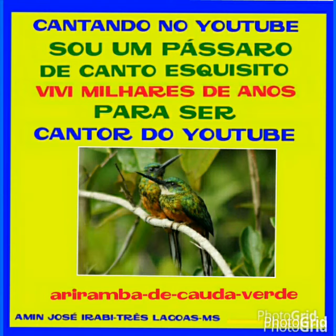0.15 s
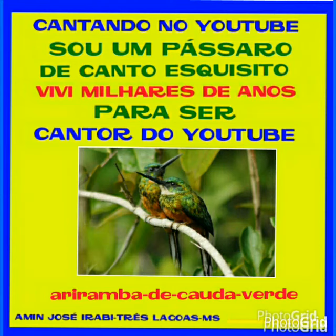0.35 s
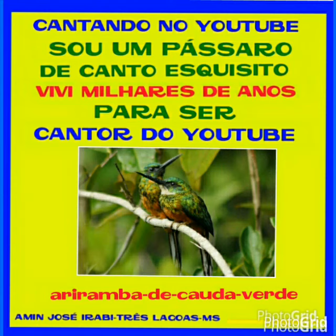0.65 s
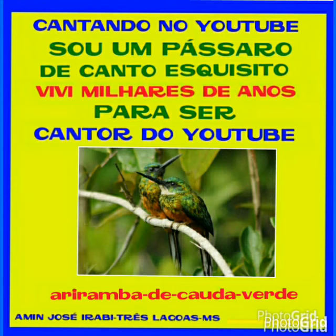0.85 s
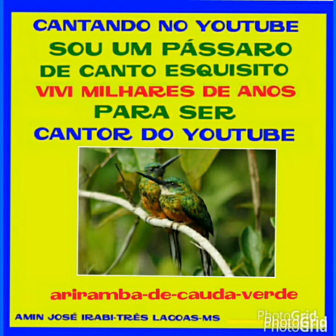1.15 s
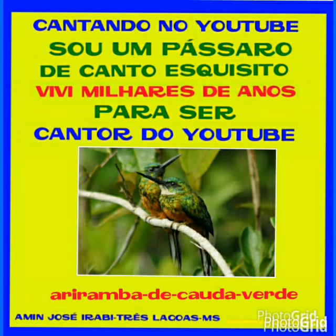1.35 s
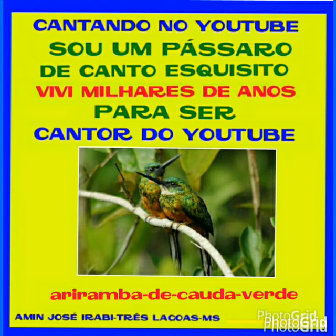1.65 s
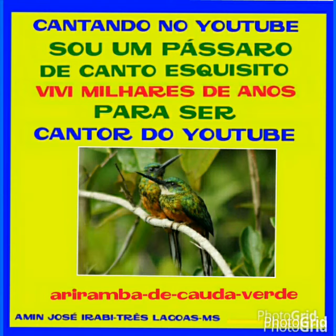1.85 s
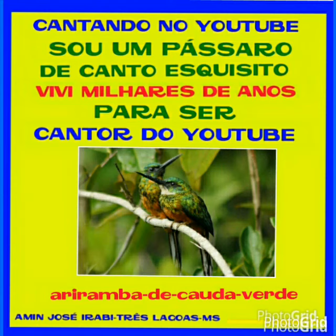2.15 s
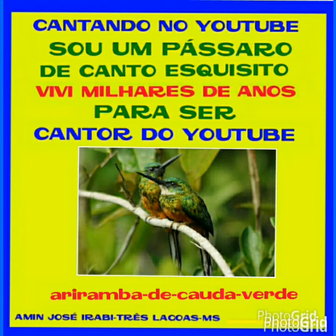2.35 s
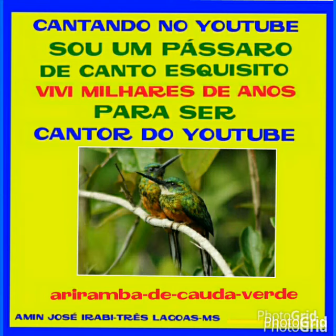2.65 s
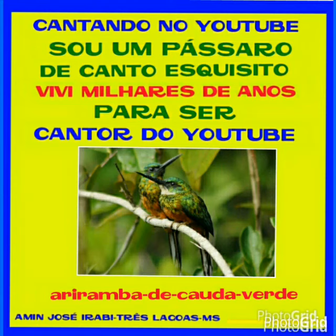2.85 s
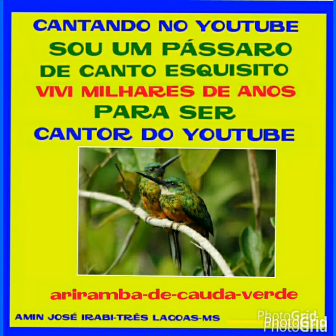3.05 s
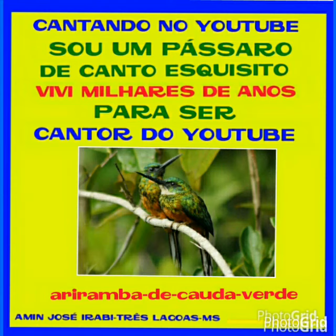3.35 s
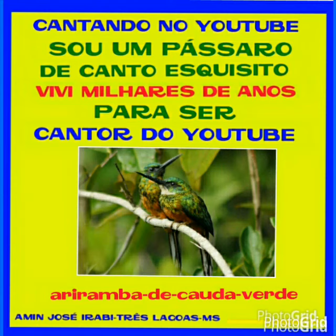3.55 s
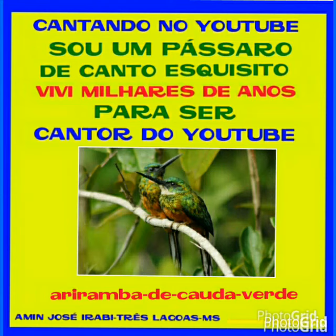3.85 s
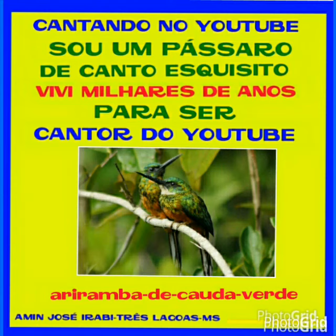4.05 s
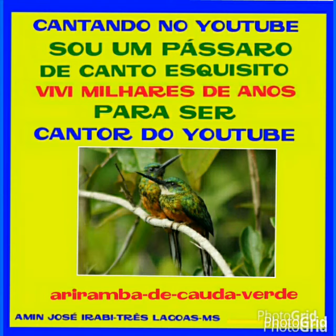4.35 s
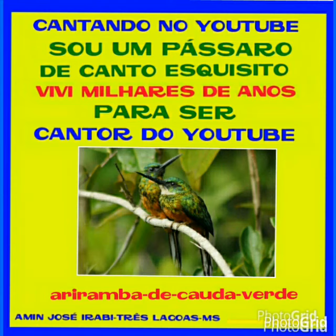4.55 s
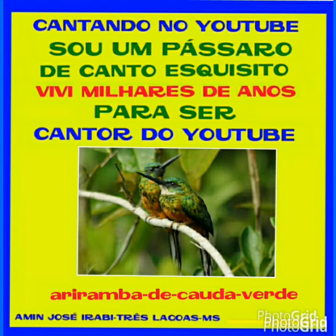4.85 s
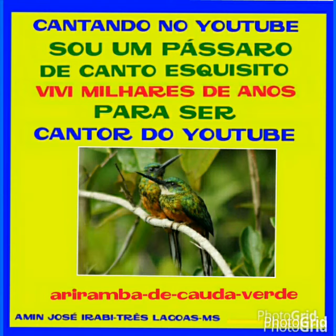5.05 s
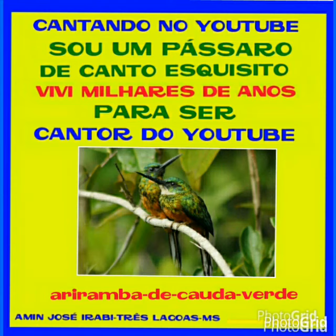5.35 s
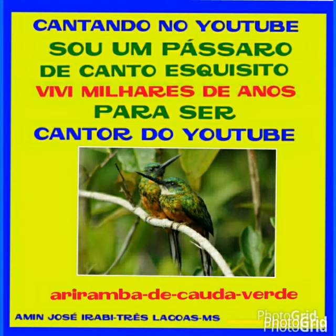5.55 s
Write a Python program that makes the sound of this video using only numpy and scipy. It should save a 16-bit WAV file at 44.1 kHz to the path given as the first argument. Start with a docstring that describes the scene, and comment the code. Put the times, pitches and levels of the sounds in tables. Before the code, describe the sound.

Two small birds sing together among trees, one near the microphone with long, high, upslurred whistles, the other quieter and more distant with short notes. The duet grows steadily faster and higher, ending in a quick run. Underneath, a thin cicada whine sinks slightly and dies away, while occasional faint insect buzzes, a soft leafy hiss and a haze of woodland echoes fill the background.

```python
"""Woodland, one microphone, two small birds in duet. The near one sings long whistles that slur up, sag
and drop into a short rasp; its mate, further off through the leaves, sings short arched notes. Both
speed up and climb. A cicada holds a thin sinking whine and other insects buzz now and then. The trees
send back a haze of echoes from the birds and the buzzes, over a soft hiss of leaves and far insects."""
import sys
import numpy as np
from scipy import signal
from scipy.io import wavfile

SR = 44100
rng = np.random.default_rng(int(sys.argv[2]) if len(sys.argv) > 2 else 0)


def to_wav(s):
    """Save 16-bit WAV."""
    ch = np.atleast_2d(s).T  # columns
    pcm = np.round(np.clip(ch, -1, 1) * 32767)  # PCM
    wavfile.write(sys.argv[1], SR, pcm.astype(np.int16))


N = 250929

# spectrum of the forest bed: frequency_hz, relative_db
HISS_SPECTRUM = [(330, -40), (400, -5.5), (800, -14.5), (1300, -3.5), (2000, -3.5), (3000, 2), (4000, -8),
                 (5200, -8.5), (6000, -28), (7000, -69.5)]
# echoes off the trees: centre_hz, t60_s, relative_db
ECHO_BANDS = [(750, 0.1, -8), (1380, 0.22, 5.5), (2470, 0.62, 4), (4800, 0.35, 5), (4500, 0.93, 6),
              (7540, 0.062, -10)]
# insect buzzes: start_s, length_s, centre_hz, width_hz, strokes_per_s, level_db
INSECT_BUZZES = [(0.72, 0.21, 5400, 915, 140, -56), (1.22, 0.52, 5560, 900, 130, -51.5),
                 (1.75, .4, 5270, 900, 160, -62), (2.05, 0.85, 405, 40, 12, -64),
                 (2.4, 0.45, 5500, 970, 160, -54.5), (3.312, .065, 7320, 695, 340, -48),
                 (3.425, 0.07, 7330, 660, 370, -47.5), (3.545, 0.07, 7300, 680, 200, -48),
                 (3.66, 0.15, 7300, 680, 200, -62), (4.44, 0.17, 7450, 3000, 230, -42),
                 (4.54, 0.23, 7500, 2200, 110, -51), (4.95, .73, 3300, 900, 60, -44)]

# cicada phrases: start_s, length_s
CICADA_PHRASES = [(-0.2, 2.89), (2.781, 0.29), (3.085, 0.39)]
# its stepwise sinking pitch: time_s, pitch_hz
CICADA_PITCH = [(0, 3503), (.25, 3498), (.56, 3474), (.8, 3456), (1.0, 3435), (1.3, 3432), (1.85, 3416),
                (2.0, 3400), (2.25, 3370), (2.7, 3345), (2.79, 3425), (3.05, 3415), (3.12, 3470),
                (3.5, 3440)]
# its loudness: time_s, tone_db, octave_db
CICADA_LEVELS = [(0.0, -29.5, -60), (0.12, -33, -50), (0.299, -35, -52.5), (0.499, -32, -47.5),
                 (0.58, -34, -53), (0.66, -43.5, -58.5), (0.779, -30.5, -52), (0.899, -33, -62),
                 (1.02, -36.5, -43.5), (1.08, -32.5, -58.5), (1.16, -32, -45), (1.27, -36.5, -53.5),
                 (1.38, -38, -47), (1.5, -40, -57.5), (1.87, -39, -59.5), (1.94, -32, -55.5),
                 (2.05, -41.5, -58.5), (2.45, -47, -69), (2.84, -39, -81), (3.051, -63, -85),
                 (3.127, -41.5, -111), (3.499, -58, -81)]
# brief dips in the level of its whine: time_s, depth_db, width_ms
CICADA_DIPS = [(0.085, 6.5, 52), (0.172, 19, 12), (0.315, 21, 26), (0.43, 5, 16), (0.735, 21, 13),
               (0.94, 10.5, 26), (1.355, 28, 53), (1.465, 14, 14), (1.535, 34, 20), (1.705, 10, 17),
               (1.88, 10, 28), (2.025, 21, 14), (2.54, 24, 40)]

# far bird's notes: start_s
FAR_STARTS = [0.026, 0.106, 0.184, 0.297, 0.505, 0.65, 0.865, 1.095, 1.337, 1.544, 1.779, 1.964, 2.138,
              2.299, 2.44, 2.587, 2.726, 2.849, 2.977, 3.095, 3.21, 3.324, 3.436, 3.539, 3.643, 3.742,
              3.838, 3.931, 4.02, 4.111, 4.195, 4.284, 4.368, 4.456, 4.532, 4.613, 4.695, 4.774, 4.855,
              4.931, 5.007, 5.081, 5.154, 5.225, 5.296, 5.364, 5.433, 5.504, 5.573, 5.647]
# how they change through the song: time_s, length_s, closing_pitch_hz, rise_ms, fall_ms, level_db
FAR_SONG = [(0.016, 0.053, 1960, 9.2, 6.9, -28.5), (0.206, 0.048, 1962, 8.5, 12.3, -28.5),
            (0.296, 0.035, 1730, 8.5, 6.5, -26.5), (0.506, 0.088, 1847, 21.8, 12, -34),
            (0.655, 0.12, 1711, 13, 22, -33.5), (0.871, 0.13, 1550, 18.4, 11.3, -33),
            (1.335, 0.13, 1502, 16.5, 13.9, -35), (1.551, 0.13, 1660, 20.8, 21.3, -34.5),
            (2.144, 0.095, 1743, 20.5, 9.5, -36), (2.578, 0.092, 1858, 15, 6.5, -37.5),
            (2.851, 0.078, 1999, 14, 3.8, -38.5), (2.987, 0.071, 2034, 14.9, 3.4, -36),
            (3.449, 0.077, 2200, 11.6, 3, -37.5), (3.84, 0.074, 2338, 10.9, 2.5, -35.5),
            (4.464, 0.067, 2493, 6.13, 2.84, -31), (5.642, 0.056, 2663, 6.27, 4.75, -29.5)]
# its harmonics: multiple, level_db
FAR_PARTIALS = [(1, 0), (2, -9.5), (3, -35.5)]
# its throat response: frequency_hz, gain_db
FAR_THROAT = [(800, -16), (1480, -7), (1750, 0), (2200, 4), (3000, 5), (4500, -6.5), (8000, -18)]
# its direct path through the leaves to the microphone: time_s, gain_db
FAR_DIRECT = [(0.2, -14), (0.5, -3), (2.0, -2), (3.7, -1), (4.6, -6)]

# near bird's notes: start_s, length_s, opening_pitch_hz, level_db
NEAR_SONG = [(0.257, 0.208, 2233, -16), (0.713, 0.22, 2280, -17), (1.161, 0.24, 2357, -17),
             (1.607, 0.24, 2441, -17), (2.053, 0.24, 2512, -13.5), (2.475, 0.243, 2553, -14),
             (2.889, 0.238, 2593, -14.5), (3.277, 0.222, 2633, -15.5), (3.65, 0.213, 2673, -16.5),
             (3.98, 0.212, 2713, -16.5), (4.314, 0.186, 2733, -17), (4.602, 0.161, 2761, -16.5),
             (4.856, 0.146, 2788, -16), (5.085, 0.12, 2810, -17.5), (5.284, 0.105, 2850, -18.5),
             (5.455, 0.088, 2887, -18.5), (5.603, 0.075, 2940, -21)]
# its harmonics: multiple, level_db
NEAR_PARTIALS = [(1, 0), (2, -8), (3, -21)]
# its throat response: frequency_hz, gain_db
NEAR_THROAT = [(800, -22), (1500, -16), (2200, -12.5), (2900, 1.5), (3800, -23), (5000, -22.5),
               (5800, -9.5), (6300, -44), (7300, -33), (7900, -30)]
# level along each note: share_of_length, gain_db
NEAR_SHAPE = [(.1, -2), (.25, -0.5), (.5, 0.5), (.75, 1.5), (.9, -1.5), (1, -10)]
# how far overtones escape the weakness of the opening slur: time_s, exponent
NEAR_TILT = [(0, .8), (2.5, .4), (4.5, -.3)]
# flutter of the voice, growing with effort: time_s, spread_db
NEAR_FLUTTER = [(0, 1.3), (3.5, 1.5), (5.2, 2.6)]
# brief dips in level within its notes: time_s, depth_db, width_ms
NEAR_DIPS = [(0.402, 7, 31), (0.814, 21, 37), (0.889, 8.5, 15), (1.241, 10, 18), (1.324, 27.5, 17),
             (1.717, 9, 34), (1.825, 8, 21), (2.219, 23, 29.6), (2.251, 5.5, 19), (2.554, 17, 30),
             (2.653, 14, 29.5), (3.009, 20.5, 26), (3.102, 13, 17.5), (3.335, 8, 13), (3.419, 15, 12),
             (3.702, 10.5, 20), (3.816, 18, 7.8), (4.055, 11, 16), (4.146, 17, 17), (4.385, 24.5, 11),
             (4.475, 20, 5.5), (4.675, 4.5, 30), (4.744, 6, 30), (4.931, 6.5, 42), (5.157, 14, 8.7),
             (5.493, 5, 8.2)]

TIME_S = np.arange(N) / SR


def from_db(db):
    return 10 ** (np.asarray(db) / 20)


def rms_one(x):
    return x / np.sqrt(np.mean(x ** 2) + 1e-20)


def along(points, x):
    return np.interp(x, *np.transpose(points))


def at_hz(points, hz):
    points_hz, points_db = np.transpose(points)
    return np.interp(np.log(hz), np.log(points_hz), points_db)


def bandpass(x, order, low_hz, high_hz):
    return signal.sosfilt(signal.butter(order, [low_hz, high_hz], "band", fs=SR, output="sos"), x)


def drift(rate_hz):
    """A random wander with a spread of one, mostly slower than rate_hz."""
    pole = np.exp(-80 * np.pi * rate_hz / SR)
    slow = signal.lfilter([1], [1, -2 * pole, pole * pole], rng.standard_normal(N // 40 + 2002))[2000:]
    return np.interp(np.arange(N) / 40, np.arange(len(slow)), rms_one(slow))


def dips(rows):
    """A gain of one with a bell-shaped dip at each listed moment."""
    return from_db(-sum(depth_db * 0.5 ** ((2000 * (TIME_S - time_s) / width_ms) ** 2)
                        for time_s, depth_db, width_ms in rows))


def forest_hiss(level_db=-46.5, waver_db=3.2, top_hz=6720):
    """Leaves and far insects: third-octave bands of noise, each wavering on its own."""
    edges_hz = 280 * 2 ** np.arange(0, 5, 1 / 3)
    out, white = 0, rng.standard_normal((2, N))
    for k, (low, high) in enumerate(zip(edges_hz, edges_hz[1:])):
        band_db = at_hz(HISS_SPECTRUM, np.sqrt(low * high)) + waver_db * drift(10)
        out = out + from_db(band_db) * bandpass(white[k % 2], 2, low, high)
    dull = signal.sosfilt(signal.butter(10, top_hz, fs=SR, output="sos"), out)   # distance takes the top
    return from_db(level_db) * rms_one(dull)


def tree_echoes(source, build_ms, twigs_db, twigs_ms):
    """Near twigs and ground scatter at once; then countless trunks give a tail that dies band by band."""
    t, tail = np.arange(SR) / SR, 0
    for hz, t60_s, relative_db in ECHO_BANDS:
        band = bandpass(rng.standard_normal(SR), 1, hz / 1.3, hz * 1.3) / np.sqrt(hz)
        tail = tail + band * from_db(relative_db - 60 * t / t60_s)
    trunks = 1 - np.exp(-1000 * t / build_ms)
    twigs = from_db(twigs_db) * np.exp(-1000 * t / twigs_ms)
    tail = tail * (trunks + twigs)
    return signal.fftconvolve(source, tail / np.sqrt(5 * np.sum(tail ** 2)))[:N]


def insect_buzzes():
    """Noise chopped at the stroke rate rings in the band of each insect, swelling and fading."""
    out = np.zeros(N)
    for start, length, hz, width_hz, strokes_per_s, level_db in INSECT_BUZZES:
        t = np.arange(round(length * SR)) / SR
        strokes = (.5 + .5 * np.cos(2 * np.pi * strokes_per_s * t)) * rng.standard_normal(len(t))
        buzz = rms_one(bandpass(strokes, 4, hz - width_hz / 2, hz + width_hz / 2))
        first = round(start * SR)
        out[first:first + len(t)] += from_db(level_db) * buzz * np.sin(np.pi * t / length)
    return out


def cicada(scoop_hz=646, scoop_ms=28, fade_s=0.056):
    """A thin tone with its octave, in phrases that scoop up and sink slowly; pitch and level tremble."""
    hz, gate = np.zeros(N), np.zeros(N)
    for start, length in CICADA_PHRASES:
        now = (TIME_S >= start) & (TIME_S - start < length)
        since = TIME_S[now] - start
        hz[now] = along(CICADA_PITCH, TIME_S[now]) - scoop_hz * np.exp(-1000 * since / scoop_ms)
        gate[now] = np.clip(np.minimum(since, length - since) / fade_s, 0, 1)
    phase = 2 * np.pi * np.cumsum(hz + 2.7 * drift(28)) / SR
    when, tone_db, octave_db = np.transpose(CICADA_LEVELS)
    tone = from_db(np.interp(TIME_S, when, tone_db) + 2.2 * drift(23)) * np.sin(phase)
    octave = from_db(np.interp(TIME_S, when, octave_db) + 3.5 * drift(33)) * np.sin(2 * phase)
    return np.sqrt(2) * gate * (dips(CICADA_DIPS) * tone + octave)


def whistles(notes, partials, throat, shape, tilt, slur, knee, slur_db, close_db,
             fade_in_ms, waver, flutter_db):
    """A bird's voice: each note creeps in low, slurs up, glides and snaps down again."""
    unsteady = 1 + waver * drift(82)
    # eddies in the air shake the overtones most
    flutter = [from_db(flutter_db * min(k, 2) * drift(140)) for k, _ in partials]
    out = np.zeros(N)
    for start, length, opening_hz, closing_hz, rise_ms, fall_ms, level_db, bend in notes:
        rise, fall = rise_ms / 1000, fall_ms / 1000
        before, after = 1.2 * rise, 2.3 * fall
        at = np.arange(max(round((start - before) * SR), 0), min(round((start + length + after) * SR), N))
        t = at / SR - start
        left = length - t
        # slur is the share of pitch missing at each end; knee sharpens the turn into the held note
        up = np.where(t > 0, 1 - slur * np.exp(-(np.abs(t) / rise) ** knee),
                      (1 - slur) * np.exp(t / (7.0 * rise)))
        down = np.where(left > 0, 1 - slur * np.exp(-left / fall),
                        (1 - slur) * np.exp(left / (5.7 * fall)))
        glide_hz = opening_hz + (closing_hz - opening_hz) * np.clip(t / length, 0, 1) ** bend
        hz = glide_hz * up * down * unsteady[at]
        phase = 2 * np.pi * np.cumsum(hz) / SR
        fades = np.clip(1000 * np.minimum((t + before) / fade_in_ms, (left + after) / 1.8), 0, 1)
        gain = np.sqrt(2) * from_db(level_db + along(shape, t / length)) * fades
        drop_db = close_db * (1 - down) / slur
        for (k, partial_db), shake in zip(partials, flutter):
            # low in the opening slur the voice is weak and rich in overtones
            weak_db = slur_db * (1 - up) / slur / k ** along(tilt, start)
            weight = from_db(partial_db + at_hz(throat, k * hz) + weak_db + drop_db)
            out[at] += gain * shake[at] * weight * np.sin(k * phase)
    return out


def far_bird(climb=0.03608):
    """The mate, further off: short arched notes, each climbing by a small share of its pitch."""
    when, *columns = np.transpose(FAR_SONG)
    length, hz, rise_ms, fall_ms, level_db = [np.interp(FAR_STARTS, when, c) for c in columns]
    bend = np.ones(len(hz))   # straight glides
    notes = zip(FAR_STARTS, length, hz * (1 - climb), hz, rise_ms, fall_ms, level_db, bend)
    return whistles(notes, FAR_PARTIALS, FAR_THROAT, shape=[(0, 0.0072)], tilt=[(0, 1.0)],
                    slur=0.6, knee=1.0, slur_db=-12.0, close_db=-11.0,
                    fade_in_ms=14, waver=0.004, flutter_db=2.0)


def closing_rasps(early_ms=5, swell_ms=6):
    """As each near note snaps shut it leaves a short rasp of noise that swells and dies."""
    swell = np.zeros(N)
    for start, length, _, note_db in NEAR_SONG:
        age = np.maximum(1000 * (TIME_S - start - length) + early_ms, 0) / swell_ms
        rasp_db = note_db - 28 + 1.9 * start   # later notes rasp harder
        swell += from_db(rasp_db) * age * np.exp(1 - age)
    return swell * rms_one(bandpass(rng.standard_normal(N), 4, low_hz=1300, high_hz=4000))


def near_bird():
    """Closest to the microphone: long sagging whistles; later ones slur up faster and sag further."""
    notes = []
    for start, length, hz, level_db in NEAR_SONG:
        sag = 0.1 + 0.003805 * start   # share of the pitch lost over the note
        rise_ms, fall_ms = 20 - 2.7 * start, 3.8
        bend = 1.75 - 0.17 * start   # above 1 the sag steepens towards the end
        notes.append((start, length, hz, hz * (1 - sag), rise_ms, fall_ms, level_db, bend))
    voice = whistles(notes, NEAR_PARTIALS, NEAR_THROAT, shape=NEAR_SHAPE, tilt=NEAR_TILT,
                     slur=0.5, knee=1.25, slur_db=-11.5, close_db=-7,
                     fade_in_ms=9, waver=0.0022, flutter_db=along(NEAR_FLUTTER, TIME_S))
    return dips(NEAR_DIPS) * voice


def scene():
    """What reaches the microphone: forest bed, echoes, insects and the two birds, in mono."""
    near, far = near_bird(), far_bird()
    near = near + closing_rasps()
    insects, bed = insect_buzzes(), forest_hiss()
    echoes = from_db(-6) * tree_echoes(near, build_ms=5.0, twigs_db=2.0, twigs_ms=6.0)
    echoes += from_db(-3.5) * tree_echoes(far, build_ms=15.0, twigs_db=6.0, twigs_ms=7.0)
    echoes += from_db(-2) * tree_echoes(insects, build_ms=3.0, twigs_db=-1.0, twigs_ms=58.0)
    through_leaves = from_db(along(FAR_DIRECT, TIME_S))
    return (bed + echoes + insects + cicada() + through_leaves * far + near)[None]


def record(dry):
    """A steep bass cut against wind, and a top cut: 60 dB down below 255 Hz and above 9328 Hz."""
    low_cut = signal.cheby2(10, 60, 255, "high", fs=SR, output="sos")
    top_cut = signal.cheby2(12, 60, 9328, fs=SR, output="sos")
    return signal.sosfilt(top_cut, signal.sosfilt(low_cut, dry))


dry = scene()
out = record(dry)
to_wav(out)
```